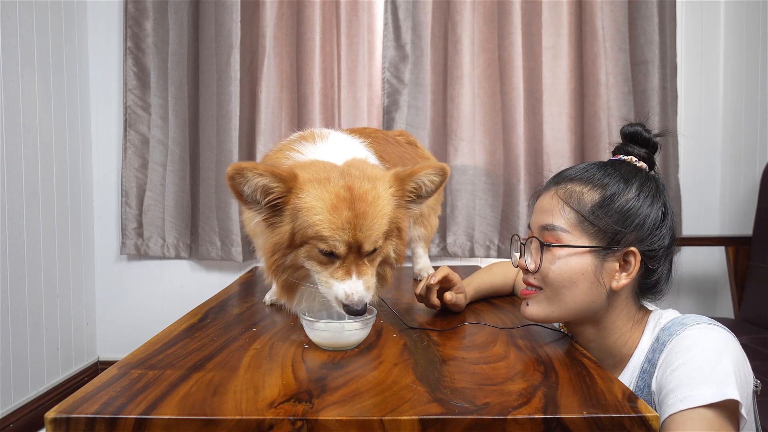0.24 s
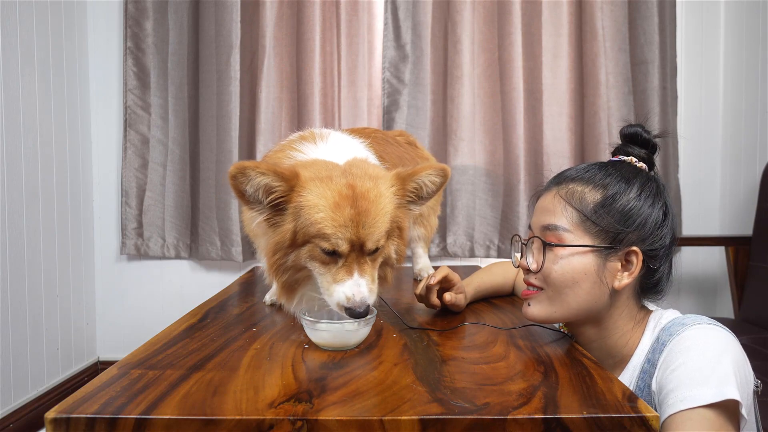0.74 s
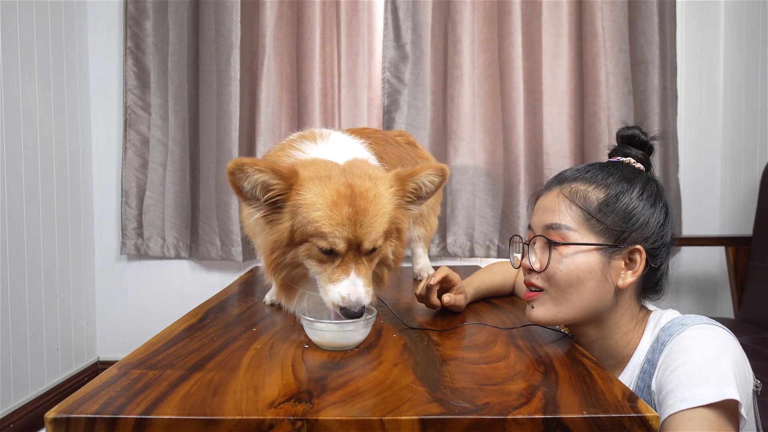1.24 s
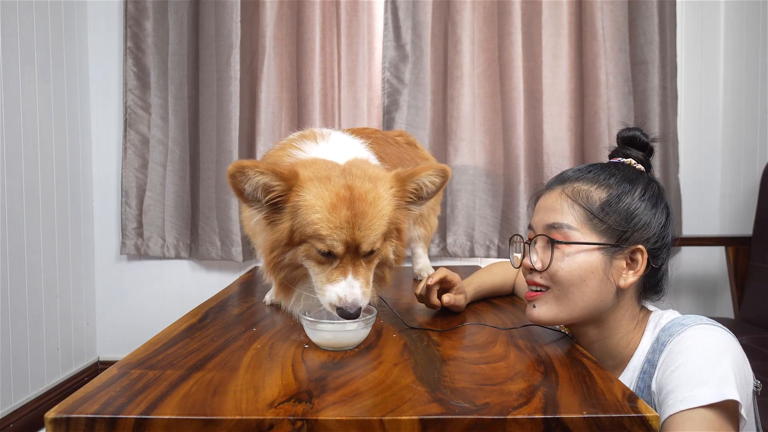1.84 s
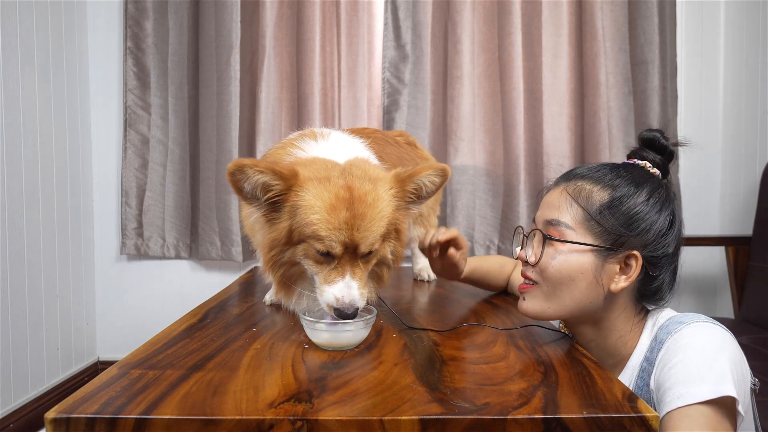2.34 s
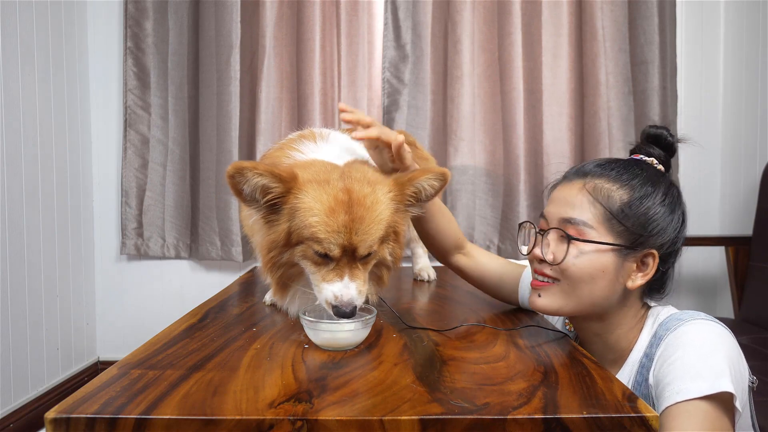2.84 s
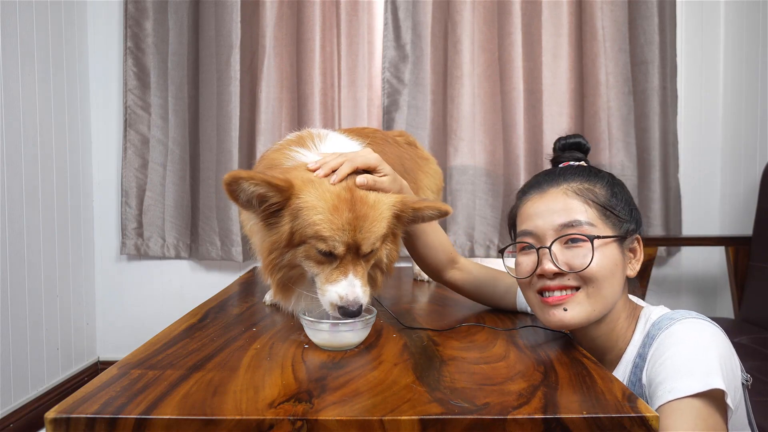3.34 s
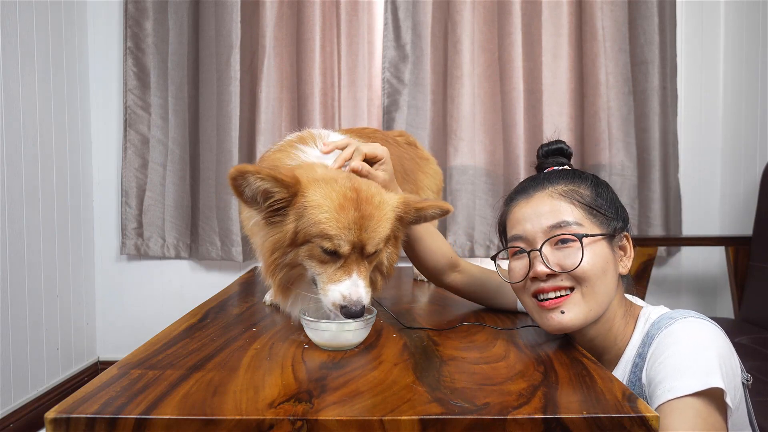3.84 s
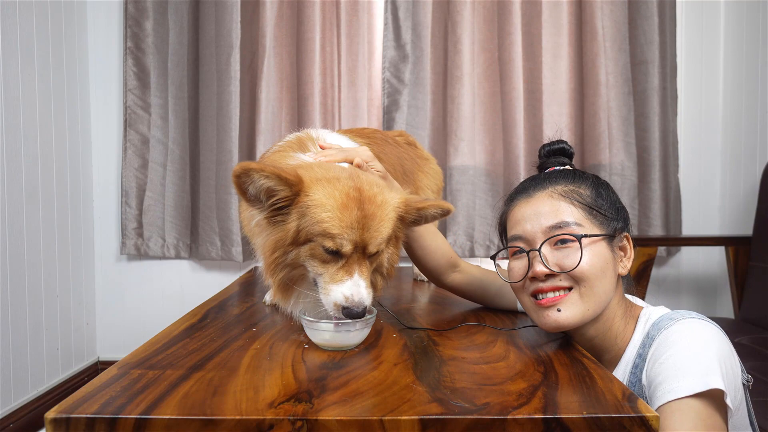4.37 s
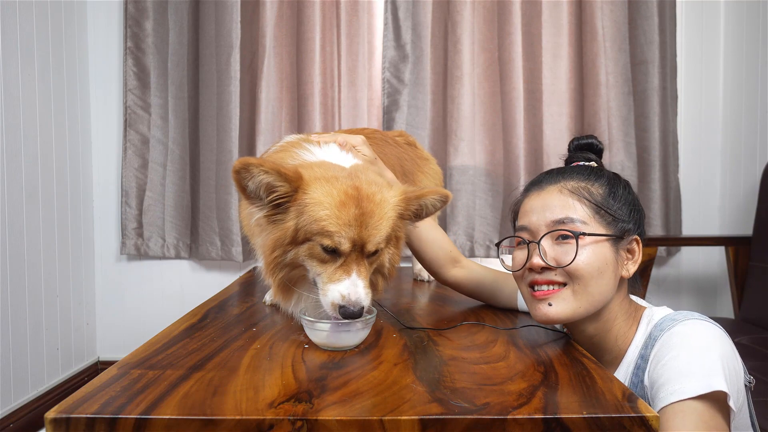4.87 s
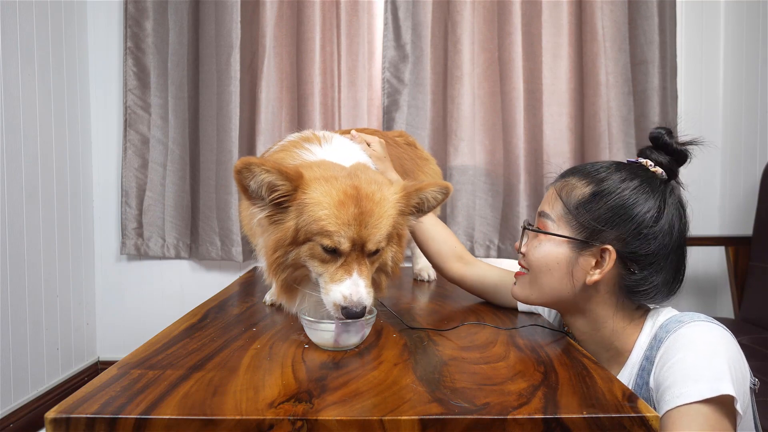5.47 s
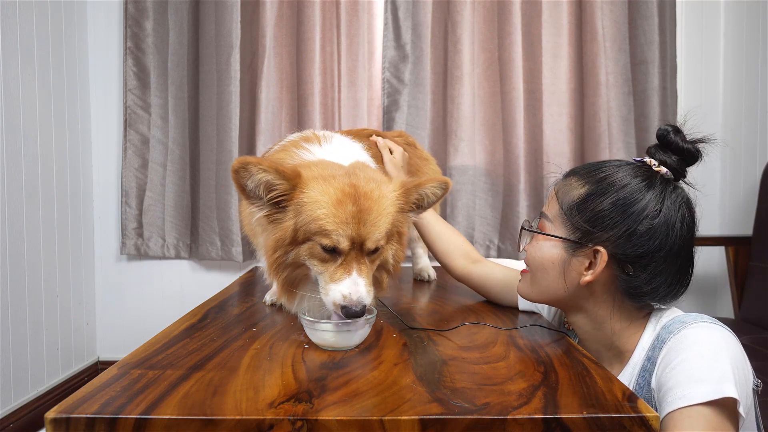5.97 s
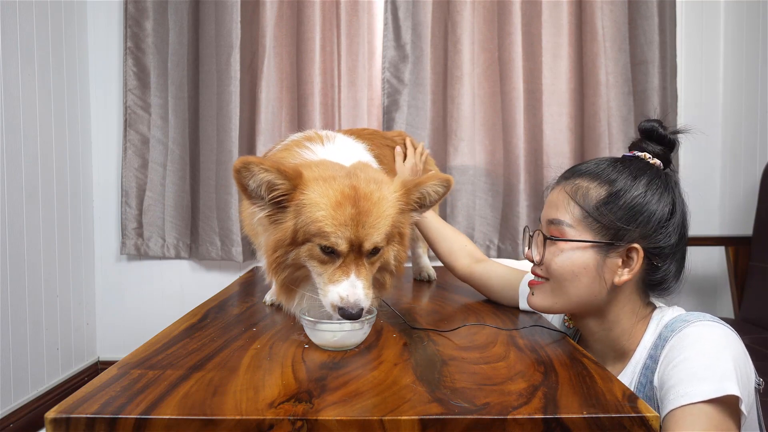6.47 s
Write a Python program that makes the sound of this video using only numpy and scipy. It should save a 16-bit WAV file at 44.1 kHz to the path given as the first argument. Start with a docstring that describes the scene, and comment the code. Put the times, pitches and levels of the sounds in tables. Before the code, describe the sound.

Close, mono, nearly dry indoor lapping. The dog's tongue strikes milk in brisk, slightly irregular strokes, already under way at the start and continuing to the end. Hollow bubbly plops mix with sharp sticky snaps, tiny chirping bubbles and light sloshing. Small dribbles and ticks bridge the short gaps, above a quiet background of hiss, faint hum and heaving low rumble.

```python
"""Dog lapping milk, close by

A dog laps milk from a small glass bowl on a wooden table in a curtained room, about three laps a second. In
each lap the tongue slaps the milk, pulls back and the jaws close: air pockets ring as gliding sines, wet films
snap as short torn noise, and saliva crackles finely as many tiny chirps and clicks. The table top throws back
one faint copy of the lapping; a faint hum sounds, and the room hisses, rumbles and shuffles."""
import sys
import numpy as np
from scipy import signal
from scipy.fft import rfft, irfft
from scipy.io import wavfile
from scipy.ndimage import uniform_filter1d

SR = 44100
rng = np.random.default_rng(int(sys.argv[2]) if len(sys.argv) > 2 else 0)


def output_pcm(signal):
    """Save a mono or channel-first signal as 16-bit PCM at the path in sys.argv[1].

    Samples are clipped to [-1, 1] before scaling.
    """
    pcm = np.clip(np.atleast_2d(signal).T, -1, 1) * 32767
    wavfile.write(sys.argv[1], SR, np.round(pcm).astype(np.int16))


N = 295911  # length of the scene in samples


def from_db(db):
    """Decibels to gain."""
    return 10 ** (np.asarray(db) / 20)


def rms_one(x):
    """Scale to unit rms."""
    return x / np.sqrt(np.mean(x ** 2) + 1e-20)


def at_hz(points, hz):
    """Read a spectrum on a log-frequency axis."""
    table_hz, table_db = np.transpose(points)
    return np.interp(np.log(hz), np.log(table_hz), table_db)


def level_over_time(points):
    """Gain at every sample, from a table of times and decibels."""
    return from_db(np.interp(np.arange(N) / SR, *np.transpose(points)))


def band(x, low_hz, high_hz, order=2):
    """Causal band-pass."""
    sos = signal.butter(order, [low_hz, min(high_hz, .45 * SR)], "band", fs=SR, output="sos")
    return signal.sosfilt(sos, x + 1e-18)


def resonate(x, hz, width_hz):
    """One resonance with unit gain on top."""
    r = np.exp(-np.pi * width_hz / SR)
    zeros = np.array([1, 0, -1]) * (1 - r * r) / 2
    poles = [1, -2 * r * np.cos(2 * np.pi * hz / SR), r * r]
    return signal.lfilter(zeros, poles, x + 1e-18)


def tinted(x, low_hz, high_hz, width_hz, count=3):
    """Ring a short sound through a few resonances picked at random in a range."""
    return sum(resonate(x, low_hz * (high_hz / low_hz) ** place, width_hz) for place in rng.random(count))


def bubble(t, hz, t60, rise, swell_cycles):
    """A pocket of air swells into ringing, its pitch gliding by the share `rise` as it dies."""
    pitch = hz * (1 + rise * (np.minimum(t / t60, 1) - .1))
    ring = np.sin(2 * np.pi * np.cumsum(pitch) / SR)
    return ring * from_db(-60 * t / t60) * (1 - np.exp(-t * hz / swell_cycles))


def tear(t, swell_s, t60, tail_db, tail_t60, uneven_db):
    """A wet film rips open in a quick uneven spurt of noise, with a weaker tail as it draws back."""
    spurt, late = rng.standard_normal((2, len(t)))
    knots = t[::24]
    uneven = from_db(uneven_db * np.interp(t, knots, rng.standard_normal(len(knots))))
    decays = spurt * from_db(-60 * t / t60) + late * from_db(tail_db - 60 * t / tail_t60)
    return decays * uneven * (1 - np.exp(-t / swell_s))


def burst(x, db):
    """Give a short sound the energy of 5 ms at this level."""
    return from_db(db) * x * np.sqrt(.005 * SR / np.sum(x ** 2))


def ticks(per_s, spread_db):
    """Random tiny ruptures, a few much larger than the rest."""
    sizes = from_db(spread_db * np.minimum(rng.exponential(1, N), 4))
    return sizes * rng.choice([-1, 1], N) * (rng.random(N) < per_s / SR)


def droplets(clicks, low_hz, high_hz, width_share, count=14):
    """Deal each click at random to one of a row of resonances, giving the clicks different colours."""
    dealt = rng.integers(0, count, N)
    out = np.zeros(N)
    for k, hz in enumerate(np.geomspace(low_hz, high_hz, count)):
        out += resonate(clicks * (dealt == k), hz, width_share * hz) / np.sqrt(hz)
    return rms_one(out)


def fizz(activity, per_s, low_hz, high_hz, cycles, spread_db, rise):
    """Tiny bubbles of random pitch and strength chirp upward as they burst; few do while the tongue rests."""
    t = np.arange(SR // 40) / SR
    out = np.zeros(N + len(t))
    for when, place, strength, chance in rng.random((int(per_s * N / SR), 4)):
        start = int(when * N)
        if chance < activity[start]:
            hz = low_hz * (high_hz / low_hz) ** place
            t60 = cycles / hz
            ring = bubble(t[t < t60], hz, t60, rise, swell_cycles=cycles / 12)
            gain = np.sqrt(hz * activity[start]) * from_db(spread_db * strength ** 3)
            out[start:start + len(ring)] += ring * gain
    return rms_one(out[:N])


def swell(start, length, attack_s, release_s):
    """A linear attack up to the start, a hold, and an exponential release."""
    t = np.arange(N) / SR - start
    return np.clip(1 + t / attack_s, 0, 1) * np.exp(-np.clip((t - length) / release_s, 0, 20))


# colour of the room's hiss: (frequency [Hz], relative level per Hz [dB])
AIR_SPECTRUM = [(70, 7.5), (150, 5.5), (300, 2.5), (480, -11), (620, -5.5), (1150, -18), (1550, -13),
                (1900, -19), (2700, -24), (3400, -28), (5000, -24), (15000, -33)]
# faint hum: (frequency [Hz], width [Hz], level [dB])
HUM_BANDS = [(417.4, 23, -58), (852, 4.8, -58)]
# the room's low rumble, slowly heaving: (time [s], level [dB])
RUMBLE_LEVEL = [(0, -45), (.6, -40), (1.8, -39.5), (2.499, -42), (3.1, -38.5), (3.8, -48.5), (4.6, -40.5),
                (5.2, -40), (5.7, -47.5), (6.7, -46)]
# soft low shuffling: (time [s], level [dB])
SHUFFLE_LEVEL = [(0, -43.5), (.35, -46.5), (.6, -49.5), (2.6, -52.5), (3.2, -46), (4.1, -53.5),
                 (5.2, -51.5), (6.7, -52)]
AIR_DB = -48


def air():
    """Shaped noise hisses and narrow noise hums over low rumbling noise and shuffling clusters of ticks."""
    hz = np.maximum(np.fft.rfftfreq(N, 1 / SR), 1)
    hiss = rms_one(irfft(rfft(rng.standard_normal(N)) * from_db(at_hz(AIR_SPECTRUM, hz)), N))
    hum = sum(from_db(db) * rms_one(resonate(rng.standard_normal(N), f, width)) for f, width, db in HUM_BANDS)
    rumble = rms_one(band(rng.standard_normal(N), 29.5, 54.0))
    shuffle = rms_one(band(ticks(per_s=250, spread_db=3.0), 130, 500))
    moving = level_over_time(RUMBLE_LEVEL) * rumble + level_over_time(SHUFFLE_LEVEL) * shuffle
    return from_db(AIR_DB) * hiss + hum + moving


ROOM_T60_S, ROOM_DB = 0.032, -27.5206  # decay time, level of the whole tail


def room(x, dull_hz=5500):
    """A short diffuse tail of decaying noise, dulled by the curtains."""
    t = np.arange(SR // 2) / SR
    decay = from_db(-60 * t / ROOM_T60_S) * (1 - np.exp(-t / 0.006))
    tail = band(rng.standard_normal(len(t)) * decay, 150, dull_hz, order=1)
    return from_db(ROOM_DB) * signal.fftconvolve(x, tail / np.sqrt(np.sum(tail ** 2)))[:N]


def reflections(x, table_s=.0028, table_db=-24.5):
    """The table top throws each sound back once, a little later and weaker."""
    n = np.arange(N)
    return x + from_db(table_db) * np.interp(n - table_s * SR, n, x, left=0)


# now and then a tiny bubble rings on: (time [s], frequency [Hz], level over 5 ms [dB])
RINGING_BUBBLES = [(.41, 7300, -48), (1.495, 7300, -46), (4.732, 7800, -48)]


def squeaks(t60=0.12, rise=-0.051):
    """Tiny bubbles that ring on thinly, sinking a little in pitch."""
    t = np.arange(SR // 4) / SR
    out = np.zeros(N + len(t))
    for s, hz, db in RINGING_BUBBLES:
        at = int(s * SR)
        out[at:at + len(t)] += burst(bubble(t, hz, t60, rise, swell_cycles=10), db)
    return out[:N]


# one row per lap of the tongue; the levels are before the trims in tongue():
# (start [s], length [s], slosh [dB], saliva crackle [dB], dribble until the next lap [dB])
TONGUE_LAPS = [(0, .11, -47, -49, -59), (0.278, 0.18, -46.5, -48, -59), (0.71, 0.19, -45, -48.5, -56),
               (1.004, 0.19, -43, -47, -57), (1.336, 0.17, -42, -49, -63.5),
               (1.805, 0.17, -42, -47.5, -58.5), (2.121, 0.18, -41.5, -47.5, -61.5),
               (2.45, 0.17, -42.5, -47, -64), (2.856, 0.18, -42.5, -52.5, -54),
               (3.178, 0.15, -40.5, -51.5, -57), (3.519, 0.2, -44.5, -50, -60.5),
               (3.945, 0.16, -43.5, -47.5, -54), (4.278, .13, -43.5, -49, -58.5),
               (4.577, 0.19, -44, -48, -59.5), (5.003, .15, -45.5, -48.5, -54),
               (5.315, 0.19, -43, -49, -58.5), (5.648, 0.14, -44, -48, -60),
               (6.086, 0.16, -43.5, -50, -53.5), (6.37, 0.19, -44.5, -50, -56.5)]
LAP_ATTACK_S, LAP_RELEASE_S = 0.004, 0.0053
# the tongue is loudest going in and as the jaws close, quieter while it lifts; the milk rocks between laps
LIFT_DIP_DB, ROCKING_DB = 6.5, -49.5


def lap_levels():
    """How hard the milk is stirred and the saliva crackles: a swell per lap, then a dribble until the next."""
    t = np.arange(N) / SR
    stir, wet = from_db(ROCKING_DB), 0
    next_starts = [row[0] for row in TONGUE_LAPS[1:]] + [N / SR]
    for (start, length, slosh_db, crackle_db, dribble_db), until in zip(TONGUE_LAPS, next_starts):
        lift = np.sin(np.pi * np.clip((t - start) / length, 0, 1)) ** 2
        lap = swell(start, length, LAP_ATTACK_S, LAP_RELEASE_S) * from_db(-LIFT_DIP_DB * lift)
        dribble = from_db(dribble_db) * swell(start, until - start, LAP_ATTACK_S, LAP_RELEASE_S)
        stir = np.maximum(stir, from_db(slosh_db) * lap)
        wet = np.maximum(wet, np.maximum(from_db(crackle_db) * lap, dribble))
    return stir, wet


# the mouth's pitch rises as the tongue lifts and falls as the jaws close
JAW_OPEN_HZ, JAW_SHUT_HZ, JAW_CLOSES_FROM = 2750, 1433, .38  # the last is a share of the lap


def slurp(level_db, focus_octaves=0.2, width_hz=220, count=9):
    """Milk drawn along the tongue swishes in the mouth, whose resonance follows the jaws."""
    turns = (0, JAW_SHUT_HZ), (JAW_CLOSES_FROM, JAW_OPEN_HZ), (1, JAW_SHUT_HZ)
    path = [(start + share * length, hz) for start, length, *_ in TONGUE_LAPS for share, hz in turns]
    mouth_hz = np.interp(np.arange(N) / SR, *np.transpose(path))
    out = np.zeros(N)
    for hz in np.geomspace(1300, 2950, count):
        near = np.exp(-(np.log2(hz / mouth_hz) / focus_octaves) ** 2)
        out += near * rms_one(resonate(ticks(per_s=700, spread_db=4.5), hz, width_hz))
    return from_db(level_db) * rms_one(out)


# hollow between muzzle and bowl: (frequency [Hz], width [Hz], relative level [dB])
HOLLOW_MODES = [(856, 210, 12.5), (1540, 500, 6.5), (2430, 255, 2), (2490, 460, 4.5)]


def hollow(x):
    """The resonances between muzzle and bowl, in parallel with alternating sign."""
    return sum((-1) ** k * from_db(db) * resonate(x, hz, width)
               for k, (hz, width, db) in enumerate(HOLLOW_MODES))


def tongue(slosh_db=-1.5, froth_db=-3.0, crackle_db=-0.5, thread_db=2.5, spray_db=-3.5, mist_db=-12.5,
           pat_db=-6.0):
    """Stirred milk sloshes in the hollow and froths, while saliva crackles and sprays off the tongue."""
    stir, wet = lap_levels()
    # the liquid tears in clumps a few milliseconds long
    clumps = rms_one(uniform_filter1d(uniform_filter1d(rng.standard_normal(N), size=150), size=90))
    slosh = rms_one(hollow(ticks(per_s=3000, spread_db=3.0) * from_db(4.0 * clumps)))
    froth = fizz(np.minimum(stir / from_db(-41.5), 1), per_s=360, low_hz=1173, high_hz=3000,
                 cycles=20.6, spread_db=24, rise=0.26)
    crackle = fizz(np.minimum(wet / from_db(-50), 1), per_s=520, low_hz=3000, high_hz=9000,
                   cycles=24, spread_db=24, rise=.1)
    spray_ticks = ticks(per_s=3000, spread_db=8.5) * from_db(6.1 * clumps)
    spray = droplets(spray_ticks, 4600, 15000, width_share=0.057)
    mist_ticks = ticks(per_s=13000, spread_db=9.0) * from_db(1.2 * clumps)
    mist = rms_one(band(mist_ticks, 4500, 22000, order=1))
    # now and then a thread of saliva parts with a small sharp tick
    threads = droplets(ticks(per_s=26, spread_db=2.5), 2400, 7500, width_share=.25)
    # the soft body of the tongue pats against the bowl
    pat = rms_one(band(ticks(per_s=120, spread_db=3.0), 170, 520))
    milk = from_db(slosh_db) * slosh + from_db(froth_db) * froth + from_db(pat_db) * pat
    saliva = from_db(crackle_db) * crackle + from_db(thread_db) * threads
    saliva += from_db(spray_db) * spray + from_db(mist_db) * mist
    return stir * milk + wet * (saliva + slurp(level_db=0.5))


def jaws(count=5, pocket_db=-39.0, spread_db=2.0, t60=0.008, scatter=0.095, rise=0.11, wet_db=-8.5):
    """Closing jaws squeeze out a run of lesser pops that falls in pitch, with some scatter."""
    t = np.arange(SR // 16) / SR
    out = np.zeros(N + SR)
    for start_s, length, *_ in TONGUE_LAPS:
        for shut in (np.arange(count) + rng.random(count)) / count:
            size, detune = rng.standard_normal(2)
            hz = JAW_OPEN_HZ * (JAW_SHUT_HZ / JAW_OPEN_HZ) ** shut * np.exp(scatter * detune)
            db = pocket_db + spread_db * size
            pocket = burst(bubble(t, hz, t60, rise, swell_cycles=1.0), db)
            film = tear(t, swell_s=.0007, t60=0.014, tail_db=-26, tail_t60=0.011, uneven_db=-4.0)
            film = burst(band(film, 3.4 * hz, 3.73 * hz), db + wet_db)
            at = int((start_s + length * (JAW_CLOSES_FROM + (1 - JAW_CLOSES_FROM) * shut)) * SR)
            out[at:at + len(t)] += pocket + film
    return out[:N]


# the loud wet pops of tongue and lips; the levels are over 5 ms, before the trims in pops():
# (time [s], air pocket [Hz], pocket decay t60 [s], pocket level [dB],
#  small bubble [Hz], small bubble level [dB], film snap level [dB])
WET_POPS = [(0.0106,980,0.068,-28,6070,-35,-31), (0.018,885,0.0087,-24,5600,-52,-46),
            (.038,2660,.012,-29,3150,-40,-40), (0.0547,2220,0.022,-35,5000,-45,-52),
            (0.078,2100,0.016,-33,3500,-52,-50), (.083,2030,0.015,-23.5,5350,-28.5,-21),
            (0.0897,1330,0.0061,-26,6760,-46,-53), (.095,1900,.011,-28,4000,-54,-57),
            (.108,1790,.012,-34,3980,-38,-62), (0.142,1550,.02,-35,3640,-37,-66),
            (0.2798,2750,0.011,-29.5,6340,-42,-42), (.295,1420,0.011,-35,6800,-37,-33),
            (0.321,1007,0.038,-27.5,4900,-23.5,-39), (0.3411,2700,0.009,-37.5,6700,-44,-33),
            (.397,2020,0.017,-30,6000,-22,-24), (0.4037,2500,0.0027,-27,4940,-29,-50),
            (.4088,2590,0.12,-34.5,7040,-30,-51), (0.4355,1590,0.016,-33.5,5240,-33,-58),
            (0.7212,1090,0.0084,-31.5,4670,-40,-47), (0.7475,944,0.061,-47,7200,-31,-36),
            (0.788,2390,.04,-21.5,5740,-24,-33), (.805,1680,0.024,-31,5730,-30,-35),
            (.832,2210,0.018,-27.5,4730,-30,-22.5), (0.8477,1730,.004,-24.5,4070,-24.5,-52),
            (0.8534,1450,0.031,-42,5170,-30,-60), (.8638,1560,0.0087,-41,5760,-30,-51),
            (0.8722,1570,0.066,-39,4640,-34,-60), (1.008,1070,.045,-36,5450,-32.5,-43),
            (1.015,1061,0.069,-22.5,4800,-31,-25.5), (1.0233,983,0.029,-16.5,5840,-26.5,-31),
            (1.0809,2030,0.0056,-29.5,7300,-63,-43), (1.088,916,0.055,-30,6500,-56,-60),
            (1.1275,2170,.011,-31,5600,-31,-38), (1.1319,2260,0.0086,-28,6200,-22.5,-21),
            (1.139,2360,0.02,-31,5370,-35,-33), (1.1522,1375,0.018,-27,5770,-22.5,-52),
            (1.1614,1640,.022,-30.5,4700,-36,-59), (1.3356,1910,0.016,-24.5,4870,-34,-62),
            (1.3834,930,0.011,-26,6600,-26,-43), (1.4014,1000,0.025,-40.5,5740,-35,-34.5),
            (1.4391,1560,0.023,-34,6540,-38,-55), (1.4613,2350,.012,-29.5,5500,-28,-40),
            (1.489,1950,0.024,-54,6700,-34,-29.5), (1.8119,2270,0.0059,-36,4800,-36,-45),
            (1.87,2750,0.014,-24.5,5400,-32,-30.5), (1.8896,2300,0.027,-27.5,6900,-34,-45),
            (1.9201,1620,.012,-29.5,6500,-27.5,-33), (2.0683,2770,0.021,-34.5,7360,-30,-28.5),
            (2.116,1675,0.039,-39,5070,-31.5,-46), (2.151,856,0.075,-34.5,6100,-37,-39),
            (2.1648,930,.039,-50,4260,-30,-34.5), (2.179,2330,.005,-31.5,6500,-50,-51),
            (2.2304,1760,0.019,-28,5020,-22,-26.5), (2.2398,1180,.021,-35.5,7160,-31,-37),
            (2.258,1590,0.0093,-26,4000,-60,-64), (2.4653,870,0.022,-23,4960,-35,-41),
            (2.4882,990,0.036,-38,5440,-33.5,-35.5), (2.5119,1540,0.026,-38.5,7160,-36,-31.5),
            (2.5682,1680,0.071,-36,4360,-48,-42), (2.5821,1950,0.022,-27.5,4250,-27,-37),
            (2.603,1826,0.052,-24.5,6200,-43,-50), (2.79,1610,0.025,-48,6900,-36,-39),
            (2.841,870,.033,-61,5320,-34.5,-40), (2.9327,1040,.023,-38,3820,-23,-34),
            (2.9598,2760,0.0086,-28,5530,-37,-33.5), (3.0022,2480,0.0073,-33,5120,-26,-30),
            (3.0075,1590,0.025,-32,4940,-34,-30), (3.1944,2520,0.012,-28,4130,-40,-48),
            (3.207,853,0.077,-31,6400,-50,-40), (3.233,837,0.054,-22.5,6400,-41,-40),
            (3.251,810,.016,-47,6150,-30.5,-38), (3.3008,2550,.028,-39,5130,-28,-20),
            (3.3088,2840,0.042,-34,7780,-24.5,-34), (3.3292,1200,0.011,-29.5,4170,-32,-61),
            (3.35,1470,0.024,-42,6940,-25.5,-31.5), (3.5286,1710,.035,-30.5,4050,-31,-40),
            (3.5638,934,0.041,-18,5020,-23.5,-30), (3.636,1520,0.037,-25.5,5100,-23,-23.5),
            (3.6628,1470,.007,-28.5,3470,-39,-61), (3.6893,1590,0.046,-64,6470,-26,-67),
            (3.8434,1540,0.015,-20.5,3780,-41,-53), (3.8474,1570,0.02,-26,4800,-53,-53),
            (3.8675,1440,0.0043,-33.5,6200,-44,-53), (3.9464,1670,.023,-37.5,5000,-42,-40),
            (4.025,2300,.023,-33,4950,-40,-52), (4.056,1810,0.0028,-26.5,4850,-23,-22),
            (4.093,1190,.02,-43,5140,-36,-58), (4.1132,850,.013,-46,5000,-33,-60),
            (4.1869,1110,0.028,-39.5,7200,-29,-18), (4.2932,2700,.018,-31.5,6600,-34,-31),
            (4.313,923,0.03,-32,5800,-49,-34), (4.334,2680,0.015,-27.5,7250,-28.5,-28.5),
            (4.3639,2840,0.0076,-27.5,5120,-27,-26.5), (4.3741,2370,0.01,-28,6400,-34,-54),
            (4.3938,1620,0.022,-29.5,4450,-32,-64), (4.5112,1610,0.023,-48,6640,-34,-35),
            (4.582,1250,0.039,-33.5,5500,-34.5,-49), (4.622,1016,.039,-26,6600,-27.5,-34),
            (4.649,2870,.016,-35.5,6700,-36,-35.5), (4.6796,2270,.027,-31,6860,-49,-47),
            (4.6995,2200,0.0035,-23,4560,-27,-24), (4.7295,1500,0.015,-21,4500,-24.5,-39),
            (4.9664,1384,0.015,-32.5,3770,-54,-68), (4.972,1075,.023,-32,4360,-60,-67),
            (5.022,1580,0.026,-33.5,7000,-54,-37), (5.064,940,0.039,-35,3240,-32,-40),
            (5.072,2600,0.011,-32,3580,-38,-42), (5.095,2360,0.016,-25,5800,-48,-60),
            (5.13,1895,.045,-26,5130,-28,-25.5), (5.1374,2000,0.0018,-27,7360,-37,-45),
            (5.2429,1110,0.02,-32,5560,-40,-33.5), (5.364,2600,0.047,-37,7300,-26.5,-26),
            (5.391,2710,.005,-30,3450,-48,-47), (5.3997,2470,.023,-29,3700,-48,-55),
            (5.4305,3000,0.01,-31.5,3400,-44,-42), (5.4364,2120,0.016,-34,6310,-27.5,-27.5),
            (5.445,1930,0.024,-30,6500,-45,-33), (5.4531,1490,.009,-39,6540,-29.5,-47),
            (5.4628,1500,0.015,-28,4100,-48,-56), (5.473,1420,0.0092,-29,4560,-54,-59),
            (5.489,3050,0.044,-37,3670,-25,-42), (5.5821,940,0.032,-32.5,5350,-45,-35.5),
            (5.6563,1270,0.014,-30.5,4400,-41,-49), (5.689,1054,0.021,-23,6930,-23,-31),
            (5.7461,2150,0.0035,-26,5500,-40,-39), (5.7593,2100,0.021,-36,6600,-39,-35),
            (5.7623,2300,0.032,-29,6400,-24,-24), (5.7939,1590,0.015,-26,5230,-46,-64),
            (6.0087,1120,0.019,-29,6000,-43,-50), (6.0963,1180,0.016,-30,3970,-35,-40),
            (6.1712,2120,0.044,-26.5,5440,-41,-43), (6.209,1600,0.013,-30.5,6640,-30,-44),
            (6.32,1320,0.0064,-36.5,6970,-29.5,-37), (6.4024,1040,0.05,-34.5,5460,-38,-45),
            (6.486,2320,.018,-36,4500,-51,-55), (6.5123,2210,0.014,-26.5,6330,-29,-25),
            (6.6655,847,0.023,-34.5,5350,-35.5,-41.5)]
POCKET_GLIDE, POCKET_GLIDE_SPREAD = -.02, 0.1  # change of pitch while a pocket rings, as a share
FILM_UNEVEN_DB = 9


def pops(thud_db=-17.5, pocket_db=3.08, smack_db=-6.0, bead_db=-3.5, spray_db=-4.5, snap_db=0.0,
         bead_lag_s=0.00115, mouth_db=13.5):
    """Each bursting film rings its air pocket and the mouth, sheds a small bubble and throws a bright snap."""
    t = np.arange(SR // 16) / SR
    knots = t[::110]
    out = np.zeros(N + len(t))
    for s, hz, t60, db, bead_hz, small_db, film_db in WET_POPS:
        glide, lag = rng.random(2)
        # the moving tongue squeezes the pocket, so its pitch wobbles
        squeeze = 1 + .045 * np.interp(t, knots, rng.standard_normal(len(knots)))
        rise = POCKET_GLIDE + POCKET_GLIDE_SPREAD * (glide - .5)
        pocket = burst(bubble(t, hz * squeeze, t60, rise, swell_cycles=0.34), db + pocket_db)
        # quick pops tear at once, slow gulps take longer
        rip = .0035 + .17 * t60
        smack = tear(t, swell_s=0.0021, t60=1.9 * rip, tail_db=-23.0, tail_t60=0.037, uneven_db=7.0)
        smack = band(smack, 980, 1890)
        smack = burst(smack + from_db(mouth_db) * resonate(smack, 2920, 400), db + smack_db)
        # the small bubble follows after a random lag
        bead_t = np.maximum(t - lag * bead_lag_s, 0)
        bead = burst(bubble(bead_t, bead_hz, t60=0.013, rise=0.57, swell_cycles=1.0), small_db + bead_db)
        film = tear(t, swell_s=0.00057, t60=rip, tail_db=-19, tail_t60=0.028, uneven_db=FILM_UNEVEN_DB)
        spray = tinted(band(film, 3330, 8050), 3310, 7100, width_hz=930, count=4)
        spray = burst(spray, small_db + spray_db)
        # every film snaps with a colour of its own
        bright = band(film, 7380, 17200, order=3)
        snap = burst(0.28 * bright + tinted(bright, 7030, 13300, width_hz=1040), film_db + snap_db)
        # the soft flesh round the pocket gives a dull thud
        thud = tear(t, swell_s=0.0011, t60=.014, tail_db=-24, tail_t60=.04, uneven_db=2.5)
        thud = burst(band(thud, 172, 464), db + thud_db)
        start = max(0, round(s * SR))
        out[start:start + len(t)] += pocket + smack + bead + spray + snap + thud
    return out[:N]


def scene():
    """The lapping close by, its room and the background, as one channel."""
    lapping = reflections(pops() + jaws() + squeaks() + tongue())
    return (lapping + room(lapping) + air())[None]


CUTOFF_HZ = 15800


def record(dry):
    """A mono microphone signal whose top is cut steeply by an elliptic low-pass."""
    return signal.sosfilt(signal.ellip(10, .1, 80, CUTOFF_HZ, fs=SR, output="sos"), dry)


dry = scene()
out = record(dry)
output_pcm(out)
```